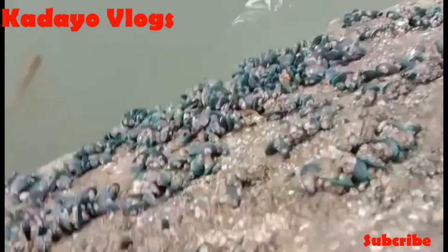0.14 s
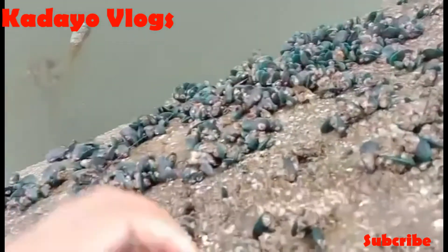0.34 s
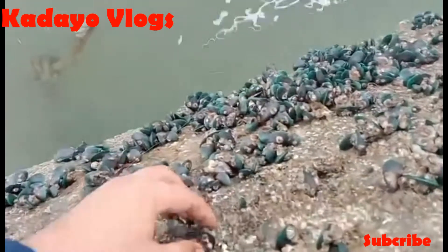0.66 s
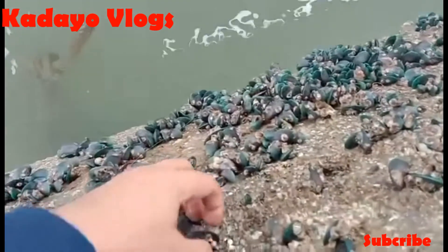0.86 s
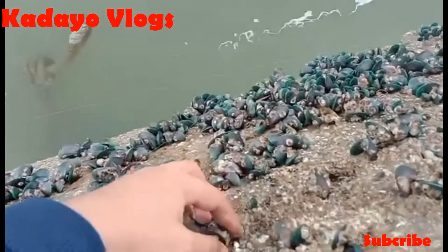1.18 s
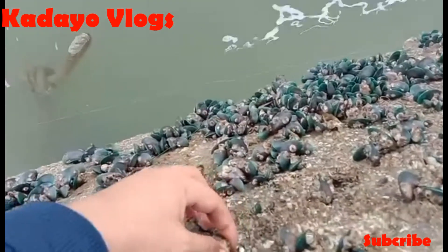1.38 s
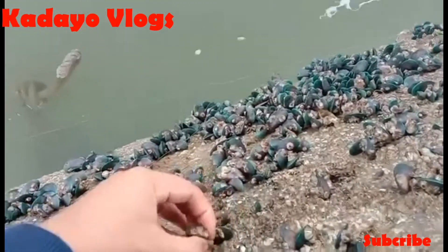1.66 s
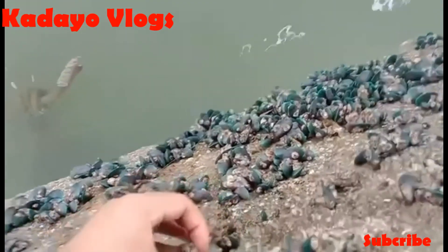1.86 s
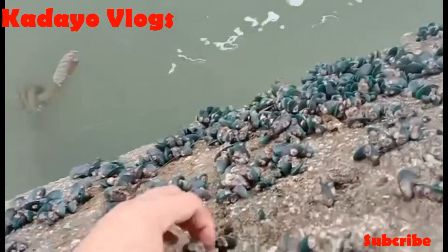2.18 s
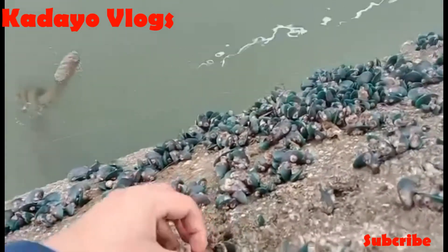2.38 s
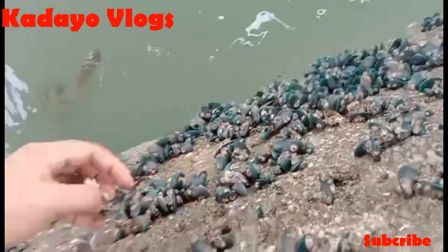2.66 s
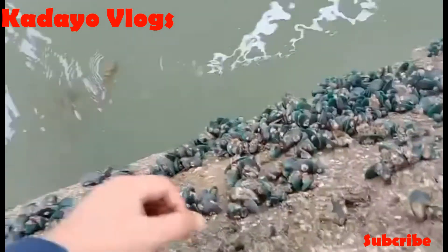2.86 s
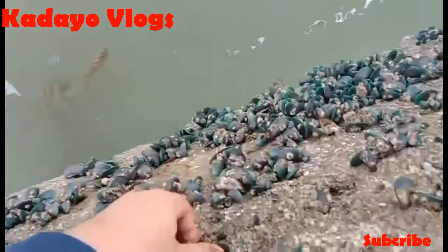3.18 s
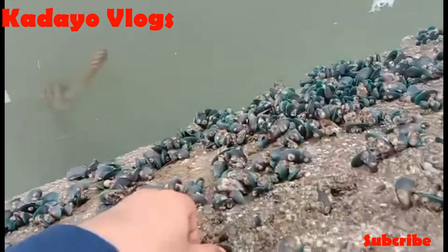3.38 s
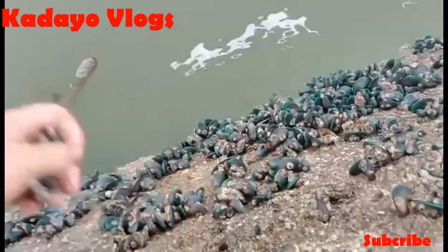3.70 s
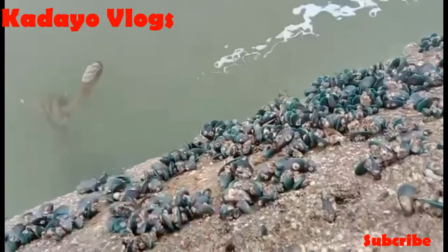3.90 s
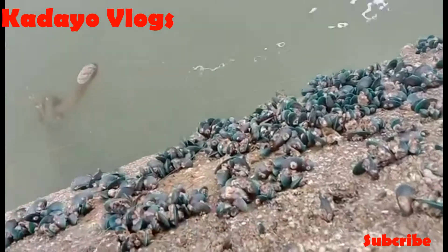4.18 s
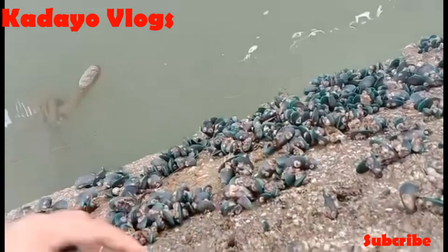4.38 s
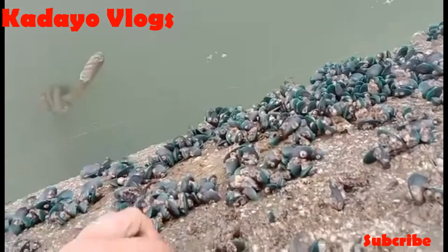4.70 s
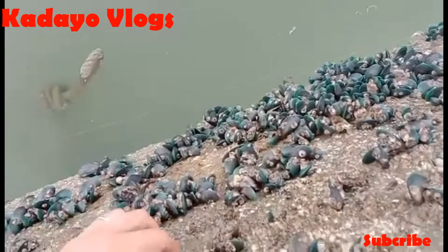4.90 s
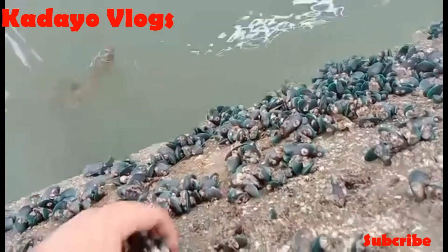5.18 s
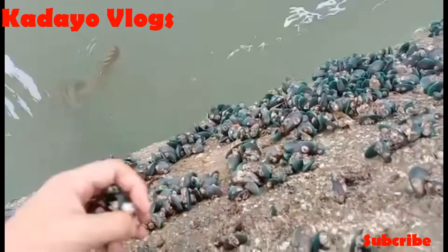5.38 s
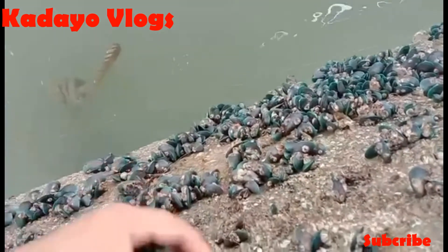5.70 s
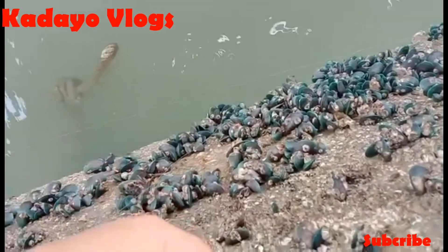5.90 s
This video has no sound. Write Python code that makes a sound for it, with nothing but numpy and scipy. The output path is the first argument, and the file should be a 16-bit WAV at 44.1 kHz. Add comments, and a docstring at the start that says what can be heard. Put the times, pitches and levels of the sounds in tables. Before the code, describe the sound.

Close gritty shell scraping and sharp clicks in irregular bursts over faint wet crackle, low rumble and hiss, with a few small water plips.

```python
"""A hand picks through a bed of mussels on a concrete sea wall, close to the microphone.
Three dull knocks, damped resonances, open the scene; then, grip after grip, grit-driven shells grind and click.
Soft thuds and swells of a low hum soon join in behind; later water plips as small bubbles ring,
and thin gliding tones squeak now and then until the last grips.
Throughout, the wet bed fizzes and crackles over filtered noise: a lumpy rumble and a fine hiss."""
import sys
import numpy as np
from scipy import signal
from scipy.fft import rfft, irfft
from scipy.io import wavfile
from scipy.ndimage import map_coordinates

SR = 44100
rng = np.random.default_rng(int(sys.argv[2]) if len(sys.argv) > 2 else 0)


def inscribe(sig):
    """Save sig as 16-bit PCM at rate SR to the path in sys.argv[1].

    A 1-D sig is mono; a 2-D sig holds one channel per row.
    Samples are clipped to [-1, 1] before scaling.
    """
    pcm = np.round(np.clip(np.atleast_2d(sig).T, -1, 1) * 32767)
    wavfile.write(sys.argv[1], SR, pcm.astype(np.int16))


N = 266760  # length in samples
LEAD_IN = SR // 200  # samples of creaking before an impact


def from_db(db):
    """Decibels to gain."""
    return 10 ** (np.asarray(db) / 20)


def rms_one(x):
    """Scale to rms 1."""
    return x / np.sqrt(np.mean(x ** 2) + 1e-20)


def at_hz(points, hz, axis=1):
    """Read a column of a table on a log-frequency axis."""
    points = np.array(points)
    return np.interp(np.log(hz + 1e-9), np.log(points[:, 0]), points[:, axis])


def band(x, low, high, order=2):
    """Butterworth band-pass."""
    sos = signal.butter(order, [low, min(high, SR / 2 - 100)], "band", fs=SR, output="sos")
    return signal.sosfilt(sos, x + 1e-18)


def colour(x, spectrum):
    """Causal minimum-phase filter with the shape of the given spectrum and a power gain of 1."""
    size = 1024
    gain = from_db(at_hz(spectrum, np.arange(size + 1) * SR / size / 2))
    # folding the cepstrum makes the filter causal
    cepstrum = irfft(np.log(gain))
    cepstrum[1:size] *= 2
    cepstrum[size + 1:] = 0
    response = irfft(np.exp(rfft(cepstrum)))
    return signal.fftconvolve(x, response / np.linalg.norm(response))[:len(x)]


def drift(per_s):
    """Smooth random wander of rms 1."""
    knots = rng.standard_normal(int(N / SR * per_s) + 2)
    return rms_one(map_coordinates(knots, [np.arange(N) * per_s / SR], mode="nearest"))


def held(t, length, attack_s, release_s):
    """Exponential attack, hold and release; t counts from the start."""
    attack = 1 - np.exp(-np.maximum(t, 0) / attack_s)
    return attack * np.exp(-np.maximum(t - length, 0) / release_s)


def add(out, s, sound):
    """Mix a sound in at a time."""
    at = round(s * SR)
    sound, at = sound[max(-at, 0):], max(at, 0)
    out[at:at + len(sound)] += sound[:max(N - at, 0)]


def at_level(sound, db):
    """Give a click the energy of three milliseconds at the stated rms level."""
    return from_db(db) * sound * np.sqrt(.003 * SR / np.sum(sound ** 2))


def grains(count, per_s, spread_db):
    """Random tiny impacts, mostly weak, a few strong; rms 1."""
    strength_db = spread_db * np.minimum(rng.exponential(1, count), 4)
    sizes = from_db(strength_db) * rng.choice([-1, 1], count)
    return rms_one(sizes * (rng.random(count) < per_s / SR))


def contact(crumble_db, crumble_s, lead_db=-21, lead_s=0.0021):
    """Grit gives way, the shells meet in one sharp impact, and the grit crumbles on for a moment."""
    t = np.arange(-LEAD_IN, SR // 30) / SR
    before = from_db(lead_db) * np.exp(-abs(t) / lead_s)
    after = from_db(crumble_db) * np.exp(-abs(t) / crumble_s)
    grit = np.where(t < 0, before, after) * grains(len(t), per_s=6700, spread_db=1.0)
    return grit + (t == 0)


def shell(force, hz, width, leak_db, ring_db, ring_hz=170, bed_db=-31, top_hz=3900, count=4):
    """A damped shell: broad resonance, weak skirt, brief modes that vary by touch, dull bed beneath."""
    ratio = 1 + width
    skirt = band(force, hz / 2.1, hz * 3.39, order=4)
    out = rms_one(band(force, hz / ratio, hz * ratio) + from_db(leak_db) * skirt)
    # ring_hz is the bandwidth of each mode: the wider, the briefer
    r, modes = np.exp(-np.pi * ring_hz / SR), 0
    for mode_hz in hz * np.exp(0.22 * rng.standard_normal(count)):
        poles = [1, -2 * r * np.cos(2 * np.pi * mode_hz / SR), r * r]
        modes = modes + signal.lfilter([1, 0, -1], poles, force) * rng.choice([-1, 1])
    out = out + from_db(ring_db) * rms_one(band(modes, hz / 2, hz * 2))
    out = out + from_db(bed_db) * rms_one(band(force, 300, 1200))
    return signal.sosfilt(signal.butter(4, max(top_hz, hz * 2.3), fs=SR, output="sos"), out)


# Tone of a shell's snapping edge, relative: freq_hz [Hz], density_db [dB per Hz]
EDGE_SPECTRUM = [(4500, -16), (6000, -5), (7200, 7), (8500, 5), (9500, -10.5), (11000, -4), (12900, -2.5),
                 (14500, -13.5)]


def snap(force):
    """The bright sound of a shell's thin edge, as force shaped by its spectrum."""
    return band(colour(force, EDGE_SPECTRUM), 2200, 20000)


# Each grip works one shell against its neighbours; levels before the stroke's own loudness:
# start_s [s], end_s [s], body_level_db [dB], body_pitch_hz [Hz], edge_level_db [dB], pressure_growth_db [dB]
GRIPS = [(0.003, 0.032, -34, 1195, -52.5, -5), (0.037, 0.092, -51, 1450, -66, -5),
         (0.203, 0.273, -46, 1235, -71, 6), (0.737, 0.801, -61.5, 2050, -78, -2),
         (1.236, 1.286, -49, 2520, -45.5, 12), (1.501, 1.643, -52.5, 2760, -61.5, -7),
         (2.261, 2.304, -42, 2270, -43.5, -6.5), (2.359, 2.395, -66.5, 2690, -59.5, 5),
         (2.949, 3.145, -70.5, 2500, -60.5, -8.5), (3.189, 3.205, -55, 2900, -45.5, 5),
         (4.358, 4.551, -54, 3010, -56, 2.5), (4.567, 4.594, -53, 3170, -52, 8.5),
         (4.605, 4.704, -44, 2460, -49, -13.5), (5.001, 5.068, -52.5, 2490, -61.5, -21),
         (6.022, 6.04, -54, 1840, -58.5, -11)]


def scrapes(release_s=0.0059, onset_share=0.1, slips_per_s=85, firm_db=-46, grit_db=-18,
            pitch_spread=0.42, rocking_db=3.0, count=10):
    """A sliding shell rocks between spots of differing pitch: light touch slips, firm touch crunches."""
    out = np.zeros(N)
    loads = [from_db(rocking_db * drift(90)) for _ in range(count)]
    for start, end, body_db, hz, edge_db, growth_db in GRIPS:
        length = max(end - start, .01)
        t = np.arange(int((length + 5 * release_s) * SR)) / SR
        now = (int(start * SR) + np.arange(len(t))) % N
        pressure = from_db(growth_db * (np.minimum(t / length, 1) - .5))
        stroke = held(t, length - release_s / 2, onset_share * length, release_s) * pressure
        # a louder grip slips more often
        rate = slips_per_s * from_db((body_db - firm_db) / 2)
        spots_hz = hz * np.exp(pitch_spread * np.linspace(-1, 1, count))
        edges_hz = rng.permutation(np.geomspace(7400, 14000, count))
        body, edge = 0, 0
        for load, spot_hz, edge_hz in zip(loads, spots_hz, edges_hz):
            slips = grains(len(t), per_s=rate, spread_db=2.5)
            slips = signal.fftconvolve(slips, contact(crumble_db=-14, crumble_s=0.0011))
            slips = slips[LEAD_IN:][:len(t)]
            grit = from_db(grit_db) * rng.standard_normal(len(t))
            force = stroke * load[now] * (rms_one(slips) + grit)
            body = body + shell(force, spot_hz, width=0.22, leak_db=-12.5, ring_db=0.0, count=2)
            edge = edge + band(force, edge_hz / 1.6, edge_hz * 1.4, order=1)
        grind = from_db(body_db) * rms_one(body) + from_db(edge_db) * rms_one(snap(edge))
        add(out, start, grind * np.sqrt(np.mean(stroke ** 2)))
    return out


# Sharp clicks, where a shell gives way or strikes another:
# start_s [s], body_level_db [dB], edge_level_db [dB], body_pitch_hz [Hz]
CLICKS = [(0.0597, -44, -47.5, 1670), (0.0798, -41, -42.5, 1620), (0.201, -53, -44, 1470),
          (0.2497, -43, -56, 1440), (0.265, -39, -48, 1380), (0.2714, -35.5, -48, 1930),
          (0.277, -26.5, -42.5, 1820), (0.371, -45, -50.5, 2330), (0.7313, -39, -55, 1690),
          (1.1163, -47, -48, 3300), (1.1314, -37.5, -45, 2380), (1.216, -65, -49.5, 2980),
          (1.233, -54, -43, 2940), (1.2705, -26.5, -50, 2820), (1.2797, -28.5, -44.5, 2270),
          (1.501, -42, -44, 3380), (1.505, -41, -49, 3020), (1.5188, -65, -40.5, 3300),
          (1.5496, -33, -52, 3360), (1.5559, -39, -51, 3240), (1.566, -42, -50, 2620),
          (1.6064, -46.5, -45.5, 2290), (2.1743, -44, -52.5, 2260), (2.2762, -38, -42, 2520),
          (2.3021, -53, -40.5, 2280), (3.0238, -48, -34, 3130), (3.055, -56.5, -48, 2850),
          (3.0766, -55.5, -52, 2860), (3.1886, -48, -42.5, 3700), (3.203, -42.5, -51, 3060),
          (3.448, -48.5, -54.5, 4320), (3.5447, -57.5, -60, 3100), (3.624, -48.5, -56.5, 2870),
          (4.378, -42, -50, 3710), (4.5146, -42.5, -49.5, 3530), (4.524, -43, -45, 3100),
          (4.586, -46, -44, 3600), (4.6058, -37, -59, 2800), (4.638, -57, -28.5, 2620),
          (4.646, -30.5, -36, 2680), (4.6801, -45, -43, 2600), (4.9807, -55, -49.5, 2880),
          (5.029, -42, -52, 2530)]


def clicks(thin_db=12, crumble_db_per_octave=10):
    """The body knocks, the thin edge snaps, brighter with its share; big shells crack, small ones crumble."""
    out = np.zeros(N)
    for s, body_db, edge_db, hz in CLICKS:
        smallness = np.log2(hz / 2500)  # octaves
        force = contact(crumble_db=-16 + crumble_db_per_octave * smallness, crumble_s=0.0027)
        knock = shell(force, hz, width=0.36 / 2 ** smallness, leak_db=-17, ring_db=-7.5)
        crack = snap(contact(crumble_db=-13, crumble_s=.0014))
        sparkle = band(crack, 12000, 18000, order=1)
        crack = crack + from_db(edge_db - body_db - thin_db) * sparkle
        add(out, s - LEAD_IN / SR, at_level(knock, body_db) + at_level(crack, edge_db))
    return out


# Dull opening knocks, very close; level before the mode levels: start_s [s], level_db [dB]
KNOCKS = [(0.002, -7.5), (0.0131, -13), (0.0294, -15.5)]
# Their brief resonances, relative to the knock: pitch_hz [Hz], level_db [dB]
KNOCK_MODES = [(440, -23), (1060, -0.5), (1600, -8.5), (2700, -15.5)]


def knocks(rise_cycles=1.4, edge_db=-37):
    """Heavy, damped bumps: each resonance swells for about a cycle and dies within a few more."""
    out, t = np.zeros(N), np.arange(SR // 30) / SR
    for s, db in KNOCKS:
        for hz, mode_db in KNOCK_MODES:
            age = t * hz / rise_cycles
            swell = (age * np.exp(1 - age)) ** 3
            add(out, s, from_db(db + mode_db) * swell * np.sin(2 * np.pi * hz * t))
        edge = snap(contact(crumble_db=-14, crumble_s=.0014))
        add(out, s - LEAD_IN / SR, at_level(edge, db + edge_db))
    return out


def stirring(lead_s=0.081, settle_s=0.043):
    """How much the bed moves: 1 during a grip, rising just before it and settling after."""
    t = np.arange(N) / SR
    moves = []
    for start, end, *_ in GRIPS:
        early, late = np.maximum(start - t, 0), np.maximum(t - end, 0)
        moves.append(np.exp(-early / lead_s - late / settle_s))
    return np.max(moves, axis=0)


def ticks(width=0.037, fizz_s=0.026, fizz_db=-68, fizz_rest_db=-79, crackle_db=-75, crackle_rest_db=-89):
    """Hollows in the wet bed fizz, each at its own pitch; grit crackles in clumps; both grow with stirring."""
    stir = stirring()
    hollows, fade = 0, np.exp(-1 / (fizz_s * SR))
    for hz in np.geomspace(1100, 4500, num=22):
        bursts = abs(grains(N, per_s=7.0, spread_db=5.5)) + 1e-18
        fizz = signal.lfilter([1], [1, -fade], bursts) * rng.standard_normal(N)
        hollow = band(fizz, hz / (1 + width), hz * (1 + width), order=1)
        hollows = hollows + rms_one(hollow) * np.sqrt(hz)
    crackle = grains(N, per_s=1700, spread_db=10.0) * from_db(9.0 * drift(60))
    crackle = rms_one(snap(crackle)) + from_db(-9.5) * rms_one(band(crackle, 1200, 3500))
    fizz_gain = from_db(fizz_rest_db) + from_db(fizz_db) * stir
    crackle_gain = from_db(crackle_rest_db) + from_db(crackle_db) * stir
    return fizz_gain * rms_one(hollows) + crackle_gain * crackle


# Water plips; ring level before the band-pass, pitch at mid-glide: start_s [s], level_db [dB], pitch_hz [Hz]
DRIPS = [(1.876, -40, 1970), (1.918, -24.5, 1890), (2.1142, -38, 2130), (3.13, -52, 1530),
         (3.499, -47, 2480)]


def drips(rise_s=0.0015, cycles=1.72, glide=0.31, wash_db=-41, wash_s=0.072):
    """Small bubbles ring for a few cycles, rising in pitch, with a brief wash up to their last note."""
    out, t = np.zeros(N), np.arange(SR // 4) / SR
    for s, db, hz in DRIPS:
        life = t * hz / cycles
        swell = (1 - np.exp(-t / rise_s)) ** 2 * np.exp(-life)
        phase = 2 * np.pi * np.cumsum(hz * (1 + glide * np.tanh(life - 1))) / SR
        ring = swell / swell.max() * np.sin(phase)
        wash = rms_one(band(rng.standard_normal(len(t)), hz, hz * (1 + glide))) * np.exp(-t / wash_s)
        # a bigger bubble stirs only a little more water
        add(out, s, from_db(db) * ring + from_db(db / 2 + wash_db) * wash)
    return band(out, 1000, 8000)


def whistle(length, start_hz, end_hz, waver, rough_db=4.0):
    """A thin, unsteady, broken tone that swells and fades; rms 1."""
    u = np.linspace(0, 1, int(length * SR))
    wander = (drift(520) + .5 * drift(49))[:len(u)]
    hz = (start_hz + (end_hz - start_hz) * u) * (1 + waver * wander)
    tone = np.sin(2 * np.pi * np.cumsum(hz) / SR)
    return rms_one(np.sin(np.pi * u) * tone * from_db(rough_db * drift(110)[:len(u)]))


# Faint squeaks: start_s [s], length_s [s], level_db [dB], start_pitch_hz [Hz], end_pitch_hz [Hz]
SQUEAKS = [(1.847, 0.04, -68, 5300, 5220), (2.126, 0.052, -66, 2540, 3130), (3.32, 0.055, -71, 5190, 5240),
           (4.032, 0.22, -72, 4430, 4500), (4.069, 0.15, -78.5, 3650, 3620),
           (5.497, 0.12, -75.5, 1113, 1200), (5.501, 0.1, -78.5, 3680, 3810),
           (5.839, 0.16, -69.5, 4550, 4500), (5.87, 0.11, -75, 3830, 3710)]


def squeaks(hoarse_per_s=0.092):
    """Thin gliding squeaks; the longer they last, the more their pitch wavers."""
    out = np.zeros(N)
    for s, length, db, start_hz, end_hz in SQUEAKS:
        add(out, s, from_db(db) * whistle(length, start_hz, end_hz, waver=hoarse_per_s * length))
    return out


# Sound scattered back by the wall: freq_hz [Hz], level_db [dB], t60_s [s]
SCATTER = [(450, -18, 0.54), (2260, -14.5, 0.072), (4850, -18.5, 0.18), (12000, -23, 0.11)]


def scatter(x, ground_s=0.0023, ground_db=-18):
    """A quick bounce off the ground, and a faint noise tail with its own decay in each band."""
    t, response = np.arange(SR // 2) / SR, 0
    edges = np.geomspace(250, 16000, num=10)
    for low, high in zip(edges, edges[1:]):
        hz = np.sqrt(low * high)
        decay = from_db(-60 * t / at_hz(SCATTER, hz, axis=2))
        tail = band(rng.standard_normal(len(t)), low, high) * decay / np.linalg.norm(decay)
        response = response + from_db(at_hz(SCATTER, hz)) * tail
    response[round(ground_s * SR)] += from_db(ground_db)
    return signal.fftconvolve(x, response)[:N]


# Soft thuds; level before an 8 dB trim: start_s [s], level_db [dB], pitch_hz [Hz]
THUDS = [(0.339, -45, 169), (0.753, -45.5, 198), (1.119, -45, 142.4), (3.207, -45, 119.4),
         (3.931, -44, 117.6), (5.259, -49, 128.8)]


def thuds(swell_s=0.027, rough=0.74):
    """Dull bumps of tone and noise that swell and mostly die within a tenth of a second."""
    out, t = np.zeros(N), np.arange(SR // 4) / SR
    swell = (t / swell_s * np.exp(1 - t / swell_s)) ** 2
    for s, db, hz in THUDS:
        lumps = rms_one(band(rng.standard_normal(len(t)), hz / 1.45, hz * 1.34))
        add(out, s, from_db(db - 8) * swell * (np.sin(2 * np.pi * hz * t) + rough * lumps))
    return out


# Swells of the low hum; level before the harmonic levels: start_s [s], end_s [s], level_db [dB]
HUM_SWELLS = [(0.41, 0.804, -67), (2.947, 3.496, -63.5), (3.711, 4.07, -67.5), (4.387, 4.645, -60.5),
              (4.948, 5.264, -62.5), (5.443, 5.986, -60.5)]
# Harmonics of the hum, before their waver: multiple [of the fundamental], level_db [dB]
HUM_HARMONICS = [(1, -3.5), (2, -5), (3, -13.5)]


def hum(pitch_hz=59, attack_s=0.075, release_s=0.048, rest_db=-90.5, waver_db=5.5):
    """A low hum in swells: harmonics of one drifting pitch, each wavering in level."""
    t = np.arange(N) / SR
    swell = from_db(rest_db)
    for start, end, db in HUM_SWELLS:
        swell = swell + from_db(db) * held(t - start, end - start, attack_s, release_s)
    phase = 2 * np.pi * np.cumsum(pitch_hz * (1 + 0.035 * drift(8.4))) / SR
    tones = 0
    for k, db in HUM_HARMONICS:
        tones = tones + from_db(db + waver_db * drift(15)) * np.sqrt(2) * np.sin(k * phase)
    return swell * tones


# Level of the rumble, before its gusts: time_s [s], level_db [dB]
RUMBLE_LEVEL = [(.7, -68), (1.8, -70), (2.8, -77.5), (3.15, -66), (3.65, -76), (4.55, -66.5), (4.8, -73),
                (6.05, -64.5)]
# Tone of the rumble, relative: freq_hz [Hz], density_db [dB per Hz]
RUMBLE_SPECTRUM = [(45, -11.5), (80, -0.5), (190, -1), (320, -18), (600, -33)]


def rumble(gust_db=2.0):
    """Lumpy low rumble: coloured noise that follows a level curve with slow random gusts."""
    level_db = np.interp(np.arange(N) / SR, *np.transpose(RUMBLE_LEVEL)) + gust_db * drift(4.2)
    return from_db(level_db) * rms_one(band(colour(rng.standard_normal(N), RUMBLE_SPECTRUM), 45, 940))


# Tone of the hiss, relative: freq_hz [Hz], density_db [dB per Hz]
HISS_SPECTRUM = [(250, -3), (500, -8.5), (2500, -15), (4000, -26), (5800, -21.5), (7000, -5.5), (8400, -8),
                 (9500, -38.5), (15000, -41.5)]


def hiss(level_db=-72, flicker_db=3.5):
    """Thin hiss of the shore: coloured noise whose treble flickers and rises a little around each grip."""
    noise = from_db(level_db) * colour(rng.standard_normal(N), HISS_SPECTRUM)  # level before the band split
    sizzle = band(noise, 6000, 16000) * from_db(flicker_db * (drift(76) + stirring()))
    return sizzle + band(noise, 100, 5000)


def scene():
    """Close shells and water with their scatter, over thuds, hum, rumble and hiss."""
    near = scrapes() + clicks() + knocks() + ticks() + drips() + squeaks()
    background = thuds() + hum() + rumble() + hiss()
    return (near + scatter(near) + background)[None]


def record(dry):
    """A steep low-pass cuts the top, 60 dB down from 15 kHz."""
    return signal.sosfilt(signal.cheby2(16, 60, 15000, fs=SR, output="sos"), dry)


dry = scene()
out = record(dry)
inscribe(out)
```